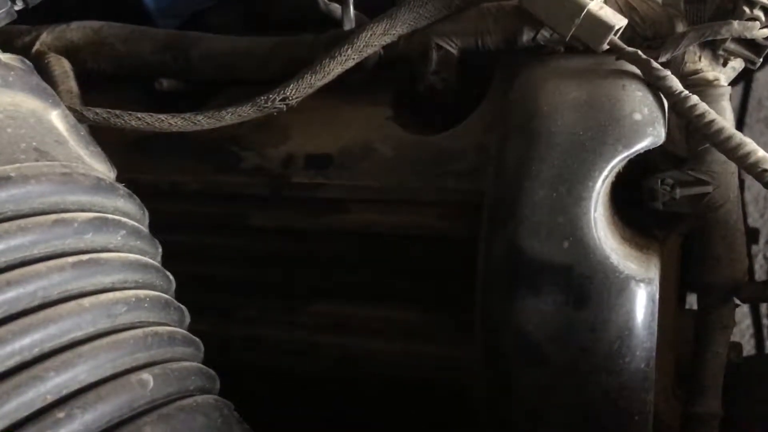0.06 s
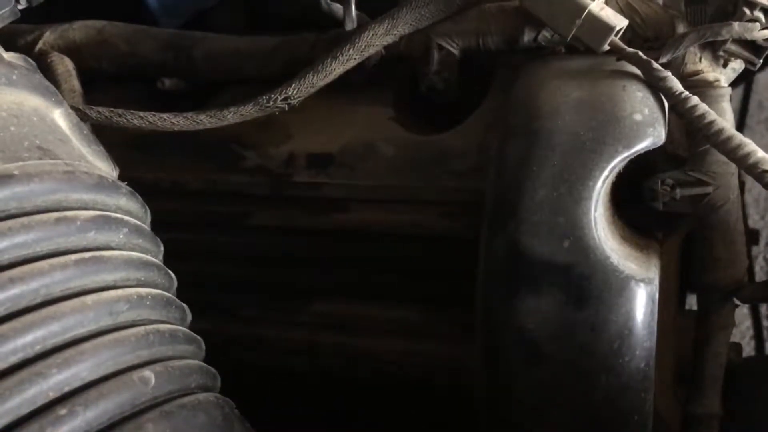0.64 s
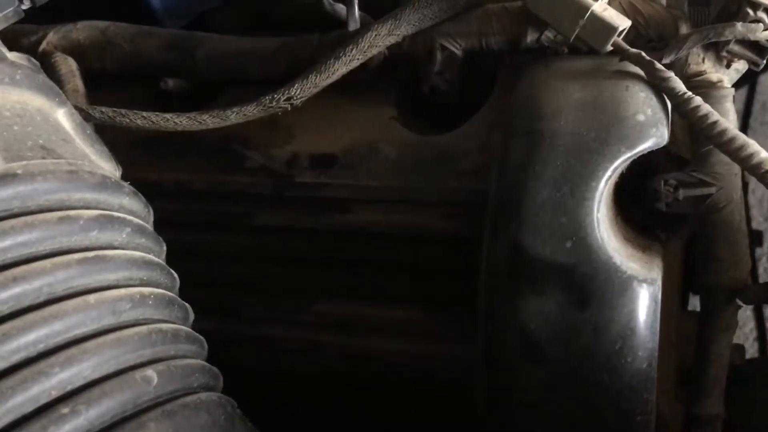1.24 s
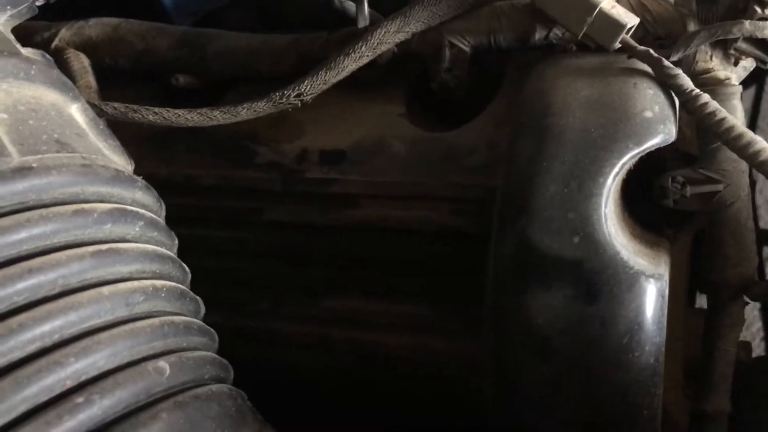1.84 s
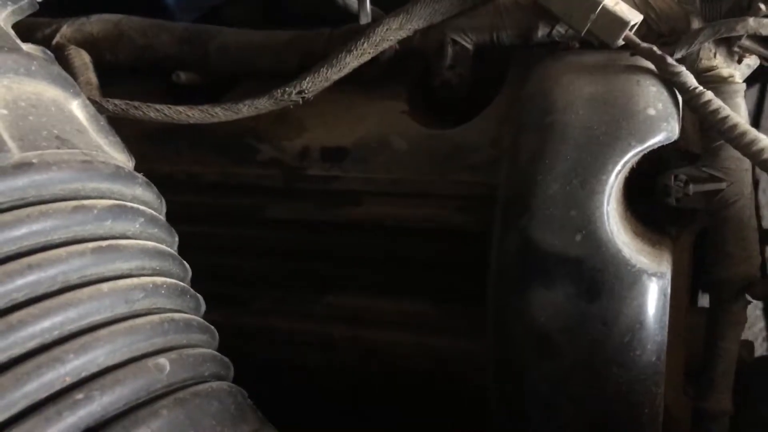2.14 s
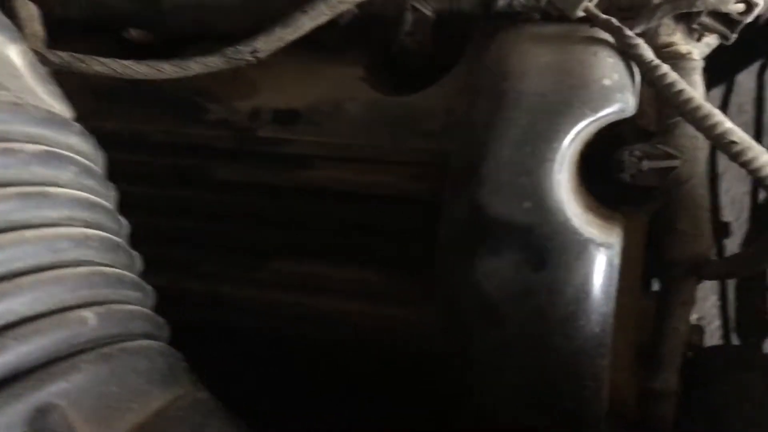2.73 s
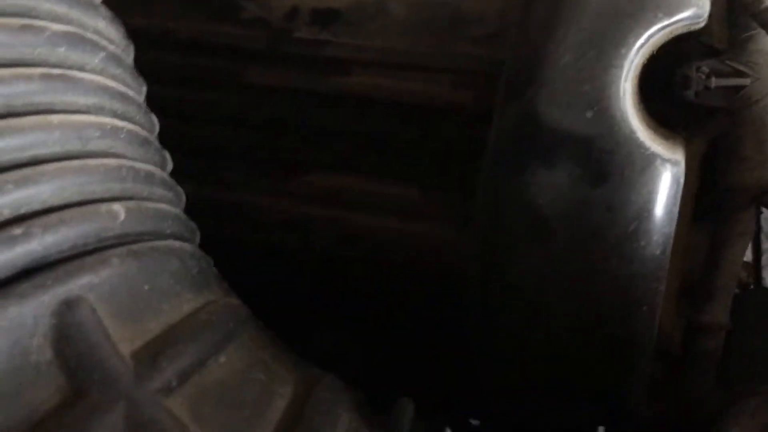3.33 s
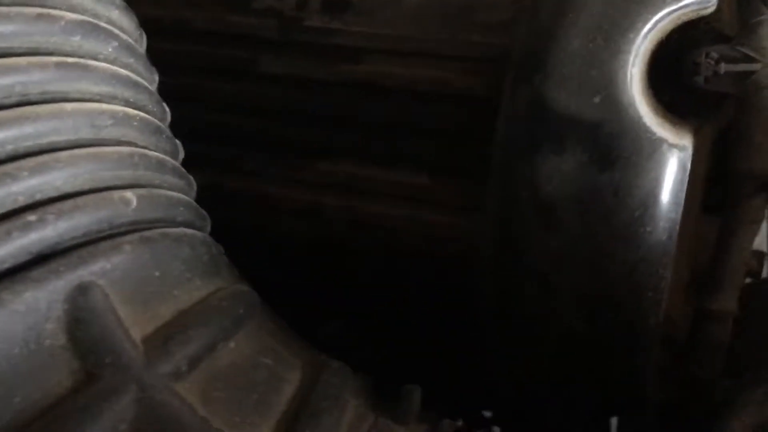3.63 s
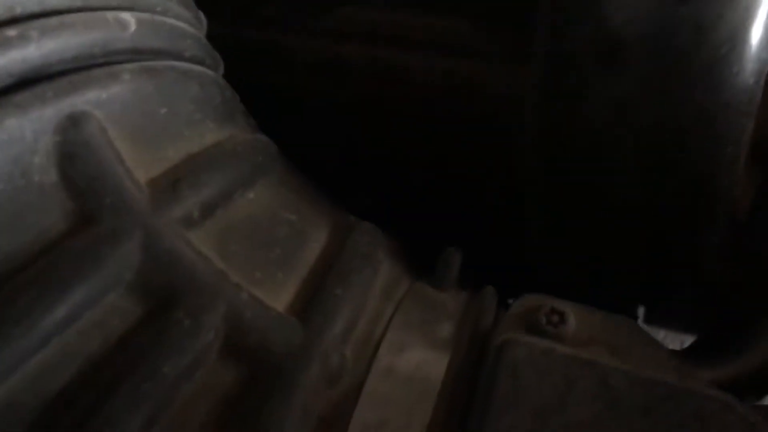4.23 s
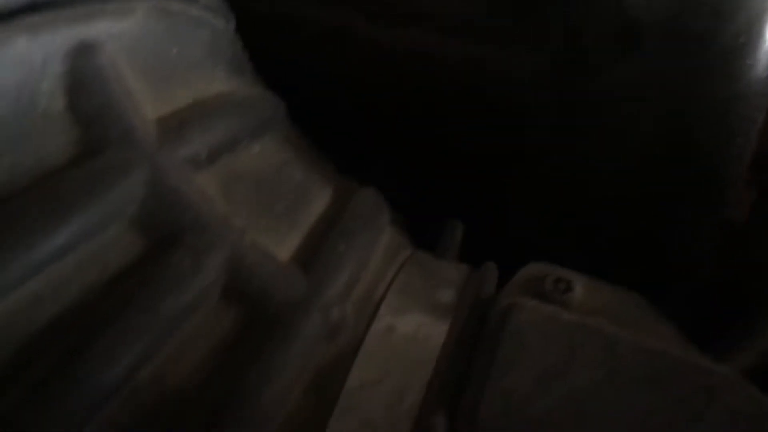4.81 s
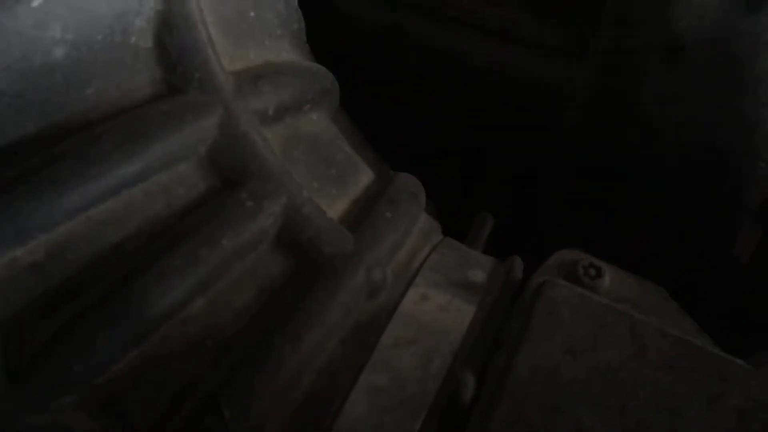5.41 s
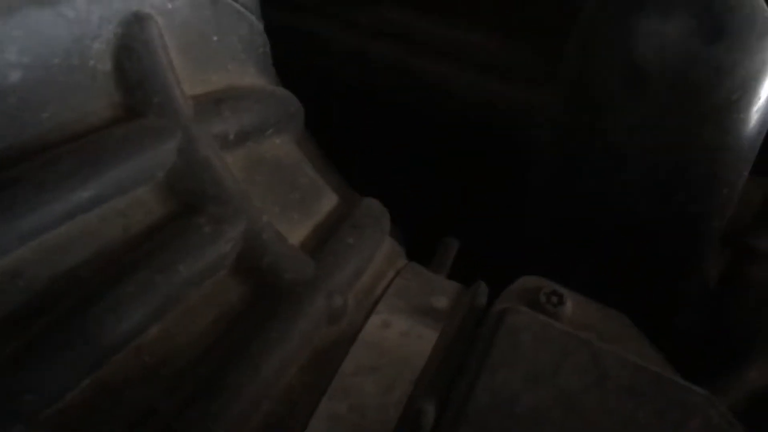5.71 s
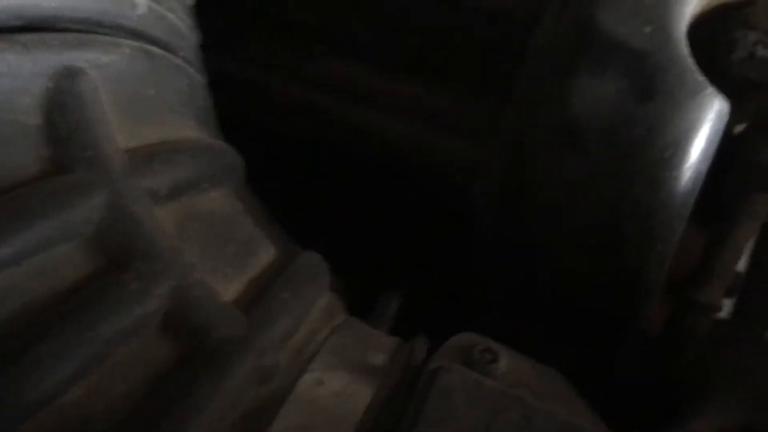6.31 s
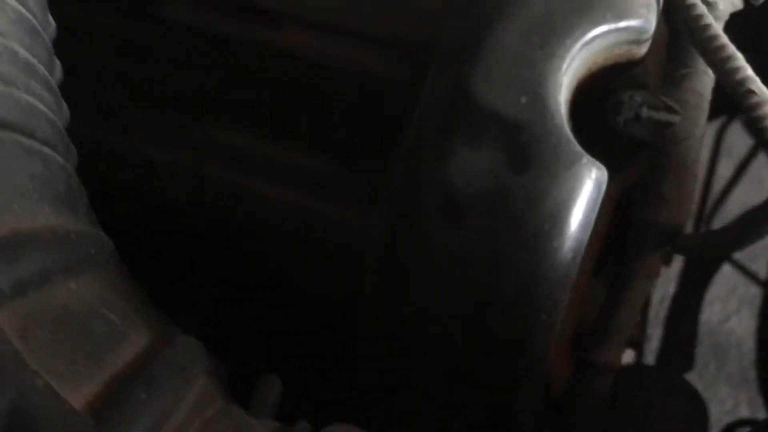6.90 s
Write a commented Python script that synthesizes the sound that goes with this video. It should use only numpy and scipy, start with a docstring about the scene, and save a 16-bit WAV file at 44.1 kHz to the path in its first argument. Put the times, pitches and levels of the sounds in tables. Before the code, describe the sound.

Under an open hood, a car engine idles, rumbling and humming while a loose lifter ticks rapidly and regularly.

```python
"""A V8 petrol engine idles close up under the open bonnet, hunting a little around 760 rpm.
From the start the firings throb, the block rumbles, the belt hisses, a fan hums and the valves clatter.
Over this bed one loose lifter ticks once a camshaft turn; from 0.6 s on, the odd hard firing thumps.
At about 3 s the microphone drifts off the valve cover, hangs over the intake duct from 5 to 6 s,
then eases halfway back, and the ring of the metal changes colour as it goes."""
import sys
import numpy as np
from scipy import signal
from scipy.fft import rfft, irfft
from scipy.io import wavfile

SR = 44100
rng = np.random.default_rng(int(sys.argv[2]) if len(sys.argv) > 2 else 0)


def dump_mix(stems):
    """Bounce the given channels to the path in sys.argv[1] as a 16-bit WAV at rate SR."""
    frames = np.atleast_2d(stems).T  # one column per channel
    limited = np.clip(frames, -1, 1)  # hard clip at full scale
    pcm = np.round(limited * 32767).astype(np.int16)
    wavfile.write(sys.argv[1], SR, pcm)


N = 315315
TIME = np.arange(N) / SR
FREQ = np.maximum(np.fft.rfftfreq(N, 1 / SR), 1)

# the hunting idle: (time [s], crankshaft speed [rpm])
IDLE_SPEED = [(0.0, 759.4), (0.75, 745.3), (1.0, 771.8), (1.25, 755.5), (2.0, 769.9), (2.75, 746.0),
              (3.25, 751.7), (4.0, 725.6), (5.0, 763.1), (6.25, 760.5), (6.5, 778.4), (7.15, 732.4)]
# the microphone's move: (time [s], place [0 at the valve cover, 1 over the duct])
MIC_PATH = [(0, 0.044), (2.7, 0.083), (3.4, 0.24), (4.2, 0.48), (4.82, .52), (5.02, 0.89), (6.1, 0.9),
            (7.15, 0.44)]
# the throb slackens briefly: (time [s], half length [s], dip of the boom [dB])
THROB_LULLS = [(0.505, 0.07, -15), (1.435, 0.051, -6), (3.13, .05, -23), (4.1, 0.096, -26),
               (5.08, 0.081, -15), (5.53, 0.067, -11), (6.01, 0.12, -13)]
# exhaust boom partials: (order [multiple of the camshaft rate], relative level [dB])
BOOM_ORDERS = [(19, -10.5), (20, 11.5), (21, 4.5), (22, -6)]
# level rides of the exhaust boom and the intake drone: (time [s], level [dB])
BOOM_RIDE = [(0, -18), (.17, -16), (.35, -20), (1.15, -20), (1.9, -22.5), (2.5, -20.5), (3.45, -19),
             (3.8, -22), (4.35, -18), (4.85, -17.5), (5.25, -24), (5.72, -17), (6.2, -20.5), (7.15, -20.5)]
DRONE_RIDE = [(0, -26), (.7, -29), (2.9, -27.5), (3.25, -35.5), (3.45, -19.5), (3.62, -26.5), (4.05, -22),
              (4.75, -23.5), (5.05, -32), (7.15, -27.5)]
# tone of block, chain, belt and valve crack: (frequency [Hz], relative level [dB])
RUMBLE_EQ = [(20, -29), (32, -15), (45, 0), (62, 2.5), (80, -0.5), (102, -2), (135, -2), (175, -6),
             (250, -7.5), (320, -11.5), (390, -17.5), (520, -21), (900, -40.5)]
RUSTLE_EQ = [(300, -15.5), (500, -2.5), (750, 3), (1000, -1.5), (1300, -1.5), (1600, -2), (1950, 0.5),
             (2400, -2.5), (2900, -4), (3400, -3), (4200, -3.5), (4800, -10.5), (6000, -9), (8000, -22)]
HISS_EQ = [(4500, -24), (5800, -3.5), (6700, 0), (7300, -4), (7900, -11.5), (8500, -2), (9600, 4),
           (10050, -3), (10400, -6.5), (11000, -7.5), (12300, -7.5), (13300, -9), (14500, -44),
           (16000, -36)]
CRACK_EQ = [(900, 2.5), (1700, 13.5), (4000, -6), (8000, 2.5), (12000, -40), (16000, -19)]
# front cover and pulley ring: (frequency [Hz], width [Hz], relative level [dB], change over duct [dB])
PULLEY_MODES = [(1232, 79, -3, 1), (1406, 76, 4, 3.5), (1520, 58, -8, -11), (1994, 44, -18, 15.5),
                (3197, 58, -16, 15.5), (3510, 30, 1.5, -21), (6580, 32, -2.5, -1), (6820, 79, -5, -1),
                (9560, 46, -18, -7), (9420, 44, -10, -7), (11010, 260, -7.5, -5)]
# fan tones: (order [multiple of the shaft rate], level [dB], change in full view [dB])
FAN_TONES = [(6, -37, 3), (8, -57, 9), (9, -42.5, 7), (12, -44, -11), (15, -46.5, -4.5), (18, -54, 7),
             (21, -52.5, 0), (24, -43.5, -1), (27, -69, 0), (30, -61, -1), (33, -53, -6)]
# the quieter valves: (lag behind the loose one [camshaft turns], relative level [dB], ping [Hz])
QUIET_VALVES = [(.15, -1.5, 1850), (.265, 3, 1470), (0.288, 0, 3100), (0.316, 1, 1970), (.52, 2, 1520),
                (0.625, 0, 3200), (.83, 1, 1470)]
# head and valve cover ring: (frequency [Hz], width [Hz], relative level [dB], change over duct [dB])
COVER_MODES = [(1280, 28, -1.5, -17), (1476, 77, -2.5, 4.5), (1701, 15, 3, 4), (1828, 68, 5, 1),
               (2103, 60, 1.5, 11.5), (2547, 40, -0.5, -15), (2695, 45, -2.5, 3.5), (3094, 68, -8.5, 13.5),
               (3267, 120, 4, -5), (3670, 73, -1, 5), (3990, 160, 1, -1.5), (4323, 98, 3.5, -10),
               (4930, 480, -15, 10), (5240, 220, -20, 6.5), (5584, 134, -6, 4), (6090, 110, -6.5, 0),
               (6440, 120, -7.5, 3.5), (6940, 150, -7, -5), (7610, 180, -9.5, 5.5), (8250, 180, -6, -2),
               (8620, 98, -22, 15), (9580, 120, -12, 9), (11600, 670, -16, -3)]
# force of the loose lifter's tick: (time [s], relative level [dB])
TICK_RIDE = [(0, 0.5), (1.3, 1.5), (2.2, -1.3), (2.45, 1.6), (3.5, 0.1), (4.7, 2), (5.05, -0.7),
             (7.15, -0.5)]
# accents where the lifter lands with a fuller knock: (time [s], boost [dB])
LIFTER_KNOCKS = [(.218, 4), (1.331, 0), (2.589, 1.5), (3.231, 3), (3.879, 1.5), (4.694, 0), (5.64, 4.8),
                 (5.954, 3.5), (6.896, 4)]
# rough firings that thump the block: (time [s], relative level [dB])
HARD_FIRINGS = [(.628, -2.5), (0.671, 1.5), (3.504, -1.5), (4.15, 2.5), (6.668, 2), (7.096, 5)]
# reflections off nearby panels: (delay [ms], change over duct [ms], relative level [dB])
PANEL_ECHOES = [(1.7, 0.1, -20.5), (2.9, -0.184, -11.5), (4.3, 0.255, -12.5), (6.8, -0.22, -13),
                (9.7, 0.316, -17.5)]

IDLE_RPM, FAN_HZ, FIRST_TICK_S, TOP_HZ = 760, 47.41, 0.0611, 15700
HUM_DB, HUM_DB_PER_RPM, HUM_DUCT_DB = -17.5, 0.12, -0.5
HUM_WAVER_DB, BOOM_WAVER_DB, DRONE_WAVER_DB = 1.16, 0.95, 2.5  # from uneven combustion
LULL_HUM_SHARE, LULL_RUMBLE_SHARE = 0.27, 0.053  # shares of the boom's dip
# beds: (level at the valve cover [dB], change over duct [dB])
RUMBLE_DB, RUSTLE_DB, HISS_DB, WHINE_DB = (-20.5, 2.5), (-28, -0.5), (-32, -2), (-43, -9.5)
FAN_REACH = 0.5  # place from which the fan is in full view
VALVE_SCATTER_DB, TICK_SCATTER_DB = 1.9, 0.36
SNAP_DB, KNOCK_DULLING = 0.46, 1.7  # the tick's treble lift; dB of treble lost per dB of knock


def amp(db):
    """Decibels to gain."""
    return 10 ** (np.asarray(db) / 20)


def unit(x):
    """Scale to rms 1."""
    return x / np.sqrt(np.mean(x ** 2))


def curve(table):
    """Join (time, value) points with straight ramps."""
    return np.interp(TIME, *np.transpose(table))


def noise():
    """White noise."""
    return rng.standard_normal(N)


def walk(hz):
    """Smooth random wobble up to about hz, at rms 1."""
    return unit(irfft(rfft(noise()) * np.exp(-(FREQ / hz) ** 2), N))


def colour(x, points):
    """EQ x through (Hz, dB) points, at rms 1."""
    hz, db = np.transpose(points)
    return unit(irfft(rfft(x) * amp(np.interp(np.log(FREQ), np.log(hz), db)), N))


def treble(x, hz):
    """The part of x above hz."""
    return irfft(rfft(x) / (1 + (hz / FREQ) ** 4), N)


def resonate(x, hz, width):
    """One resonance, gain 1 at its centre."""
    return signal.lfilter(*signal.iirpeak(hz, hz / width, fs=SR), x)


def breath(hz, width):
    """A narrow band of noise, at rms 1."""
    return unit(resonate(resonate(noise(), hz, width), hz, width))


def ring(x, modes, place):
    """Ring a metal part; the balance of its modes follows the microphone."""
    at_cover, at_duct = 0, 0
    for hz, width, db, change_db in modes:
        mode = resonate(x, hz, width)
        at_cover += amp(db) * mode
        at_duct += amp(db + change_db) * mode
    return unit(at_cover + place * (at_duct - at_cover))


def placed(levels, place):
    """Gain of a layer where the microphone is."""
    db, change_db = levels
    return amp(db + place * change_db)


def lulls():
    """The dip in dB where the throb slackens."""
    return sum(db * np.exp(-((TIME - s) / length) ** 2) for s, length, db in THROB_LULLS)


def camshaft(rpm):
    """Camshaft turns, at half crankshaft speed: a whole number at each tick of the loose lifter."""
    turns = np.cumsum(rpm / 60 / 2) / SR
    return turns - np.interp(FIRST_TICK_S, TIME, turns)


def each_turn(cam, lag):
    """The camshaft positions at which a cam with this lag comes round."""
    return np.arange(np.ceil(cam[0] - lag), cam[-1] - lag) + lag


def blows(times, db):
    """One impulse for each contact."""
    out = np.zeros(N)
    np.add.at(out, np.clip((times * SR).astype(int), 0, N - 1), amp(db))
    return out


def swell(rise, fall):
    """A 0.1 s clack envelope peaking in the middle; rise and fall are time constants in seconds."""
    t = np.arange(-SR // 20, SR // 20) / SR
    return np.exp(np.minimum(t / rise, -t / fall))


def chatter(hits, rise, fall, grain_db):
    """Slack parts chatter around each blow: tiny contacts, new every time."""
    envelope = signal.oaconvolve(hits, swell(rise, fall), "same")
    return unit(envelope * noise() * amp(grain_db * noise()))


def smear(hits, rise, fall):
    """Every blow takes the same many paths through the metal, which blur it without colouring it."""
    envelope = swell(rise, fall)
    paths = rng.standard_normal(len(envelope))
    for _ in range(2):
        spectrum = rfft(paths * envelope)
        paths = irfft(spectrum / np.abs(spectrum), len(envelope))
    return unit(signal.fftconvolve(hits, paths, "same"))


def firing_hum(angle, rpm, place):
    """Eight firings a cycle fuse into a low hum, louder as the idle picks up."""
    db = HUM_DB + HUM_DB_PER_RPM * (rpm - IDLE_RPM) + HUM_DUCT_DB * place
    db += LULL_HUM_SHARE * lulls() + HUM_WAVER_DB * walk(12)
    return amp(db) * unit(np.sin(8 * angle))


def exhaust_boom(angle):
    """Uneven firing within each bank makes the exhaust lope: its partials swell together once a cycle."""
    db = curve(BOOM_RIDE) + lulls() + BOOM_WAVER_DB * walk(5.7)
    lope = angle - 2 * np.pi * 0.62
    tones = unit(sum(amp(level) * np.cos(order * lope) for order, level in BOOM_ORDERS))
    return amp(db) * unit(tones + amp(-5) * breath(hz=130.5, width=33))


def intake_drone():
    """The air in the intake duct rings at one narrow, breathy pitch."""
    db = curve(DRONE_RIDE) + DRONE_WAVER_DB * walk(7.8)
    tone = unit(np.sin(2 * np.pi * (217.5 * TIME + 0.21 * walk(7.9))))
    return amp(db) * unit(tone + amp(-4.5) * breath(hz=222, width=24))


def block_rumble(cam, firing, place):
    """The block rumbles, pulsing with each firing and leaning slightly into the lope."""
    lope = np.cos(2 * np.pi * (cam - 0.62))
    rumble = colour(noise() * amp(0.13 * lope + 3.3 * firing), RUMBLE_EQ)
    return placed(RUMBLE_DB, place) * amp(LULL_RUMBLE_SHARE * lulls()) * rumble


def chain_rustle(firing, place):
    """Chain and bearings rustle in a fine-grained midrange wash."""
    grain_db = 2.15 * noise() + 0.99 * walk(41) + 0.27 * firing
    return placed(RUSTLE_DB, place) * colour(noise() * amp(grain_db), RUSTLE_EQ)


def belt(cam, place):
    """The belt gives a gritty hiss over ringing pulleys."""
    grain_db = 4 * noise() + 1.1 * walk(40)
    hiss = colour(noise() * amp(grain_db), HISS_EQ)
    flutter_db = 2.15 * walk(52) + 0.76 * np.cos(2 * np.pi * 4 * (cam - 0.03))
    pulleys = ring(noise() * amp(flutter_db), PULLEY_MODES, place)
    return placed(HISS_DB, place) * hiss + amp(-32.5) * pulleys


def fan(place):
    """An electric fan holds its own speed; its tones flutter in the moving air and its motor whines."""
    shaft = 2 * np.pi * (FAN_HZ * TIME + 0.0091 * walk(1.6))
    view = np.minimum(place / FAN_REACH, 1)
    tones = 0
    for order, db, change_db in FAN_TONES:
        gain = amp(db + view * change_db + 2.8 * walk(13.6))
        tones += gain * unit(np.sin(order * shaft + 0.26 * walk(12)))
    whine = unit(np.sin(16 * shaft + walk(3.1)))  # 16 motor slots
    return tones + placed(WHINE_DB, place) * amp(1.8 * walk(4)) * whine


def valves(cam, place):
    """The quieter valves close at their own cam angles, never twice alike, each with its own ping."""
    rattle, pings = 0, 0
    for lag, db, hz in QUIET_VALVES:
        turns = each_turn(cam, lag)
        late, force = rng.standard_normal((len(turns), 2)).T
        hits = blows(np.interp(turns + 0.0075 * late, cam, TIME), VALVE_SCATTER_DB * force)
        clack = amp(db) * chatter(hits, rise=0.0053, fall=0.0035, grain_db=2)
        rattle += clack
        pings += resonate(clack, hz, width=hz / 7)
    cover = ring(rattle, COVER_MODES, place)
    return amp(-36) * cover + amp(-40) * unit(pings) + amp(-49) * colour(rattle, CRACK_EQ)


def loose_lifter(cam, place):
    """Once a turn the lifter takes up its slack and slaps the valve, ringing the cover."""
    times = np.interp(each_turn(cam, 0), cam, TIME)
    knock_db = np.zeros(len(times))
    for when, boost_db in LIFTER_KNOCKS:
        knock_db[np.argmin(abs(times - when))] = boost_db
    force_db = np.interp(times, *np.transpose(TICK_RIDE)) + knock_db
    hits = blows(times, force_db - TICK_SCATTER_DB * rng.standard_normal(len(times)))
    slap = smear(hits, rise=0.012, fall=0.0082)
    rattle = chatter(hits, rise=0.005, fall=0.0064, grain_db=-1)
    cover = ring(unit(slap + amp(-1) * rattle), COVER_MODES, place)
    tick = amp(-31.5) * cover + amp(-40) * colour(rattle, CRACK_EQ)
    # a fuller knock adds body, not snap
    snap_db = np.interp(TIME, times, SNAP_DB - KNOCK_DULLING * knock_db)
    return tick + (amp(snap_db) - 1) * treble(tick, 4000)


def thumps():
    """Now and then one cylinder fires hard and the block answers with a dull knock."""
    shake = chatter(blows(*np.transpose(HARD_FIRINGS)), rise=0.011, fall=0.014, grain_db=3)
    dull_eq = [(40, -16), (90, 6), (280, 1), (420, -12.5), (680, -16), (1300, -44), (4000, -60)]
    return amp(-31.5) * colour(shake, dull_eq)


def engine_bay(x, place):
    """Panels throw the treble back, its colour shifting with the microphone; the duct shades the top."""
    high = treble(x, 4100)
    sway = place + 0.046 * walk(1.1)
    echoes = 0
    for ms, change_ms, db in PANEL_ECHOES:
        delay_s = (ms + sway * change_ms) / 1000
        echoes += amp(db) * np.interp(TIME - delay_s, TIME, high)
    x = x + (amp(-1.23) - 1) * high + amp(-2.7) * echoes
    return x + (amp(-5.5 * place ** 2) - 1) * treble(x, 12300)


def scene():
    """The mono mix: the camshaft sets the engine's rhythm while the fan runs by itself."""
    rpm, place = curve(IDLE_SPEED), curve(MIC_PATH)
    cam = camshaft(rpm)
    ticking = loose_lifter(cam, place) + valves(cam, place)
    angle = 2 * np.pi * (cam + 0.001 * walk(4.6))
    firing = np.cos(2 * np.pi * 8 * cam)
    throb = firing_hum(angle, rpm, place) + exhaust_boom(angle) + intake_drone()
    bed = block_rumble(cam, firing, place) + chain_rustle(firing, place) + belt(cam, place) + fan(place)
    return engine_bay(throb + bed + ticking + thumps(), place)[None]


def record(dry):
    """A steep low-pass trims the very top."""
    return signal.fftconvolve(dry, signal.firwin(801, TOP_HZ, fs=SR)[None], "same")


dry = scene()
out = record(dry)
dump_mix(out)
```